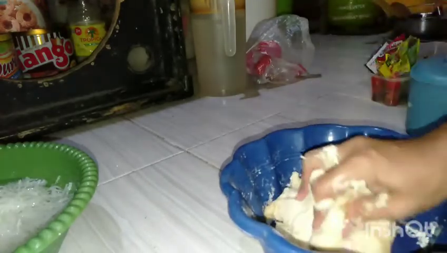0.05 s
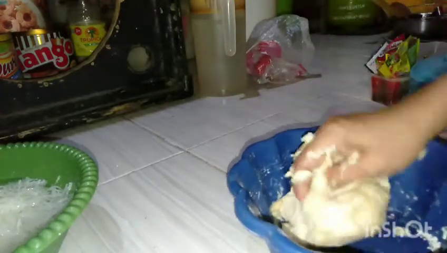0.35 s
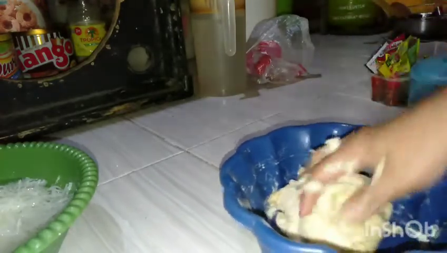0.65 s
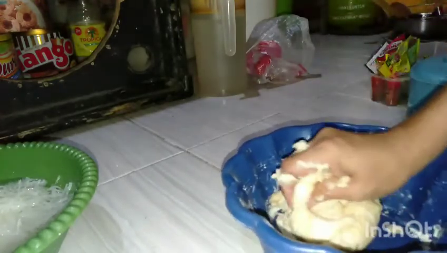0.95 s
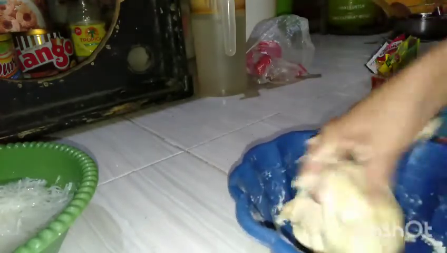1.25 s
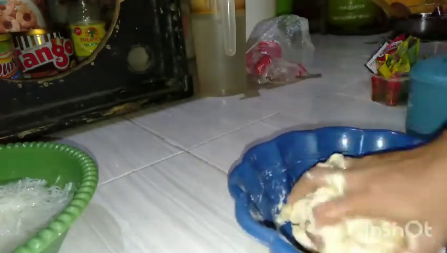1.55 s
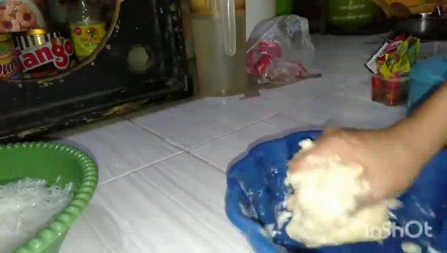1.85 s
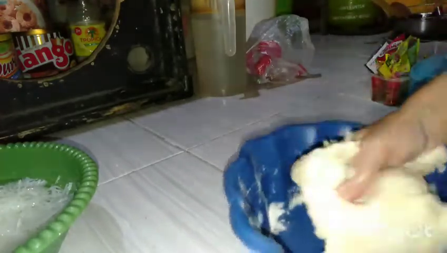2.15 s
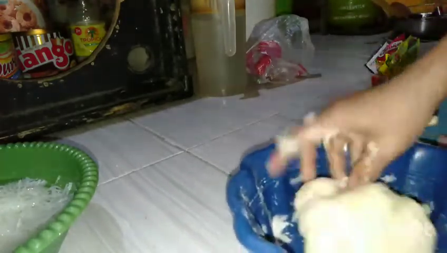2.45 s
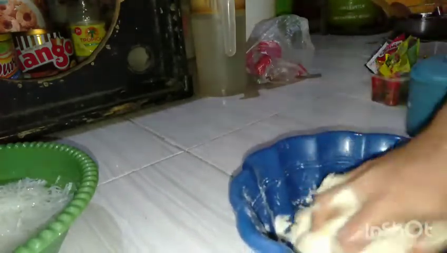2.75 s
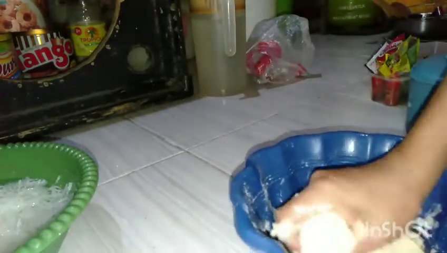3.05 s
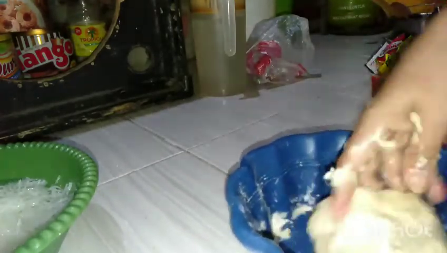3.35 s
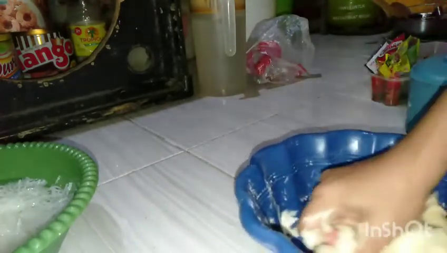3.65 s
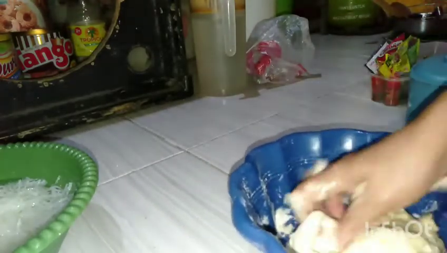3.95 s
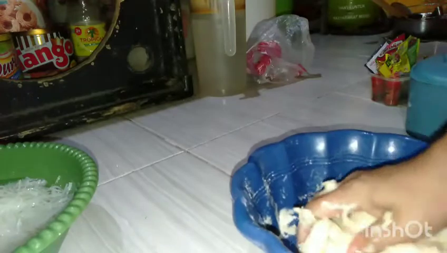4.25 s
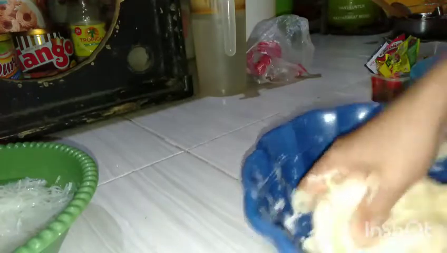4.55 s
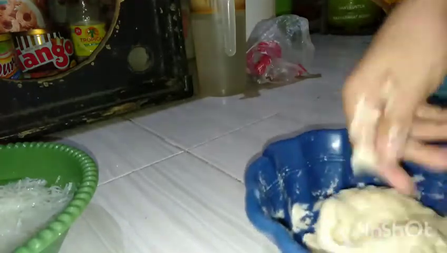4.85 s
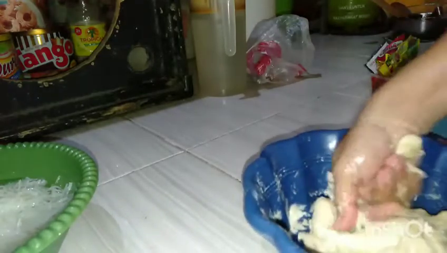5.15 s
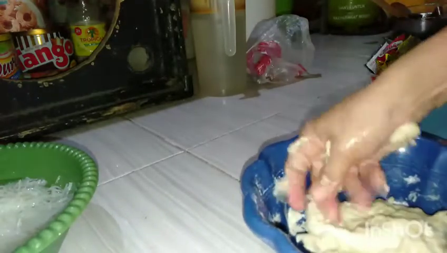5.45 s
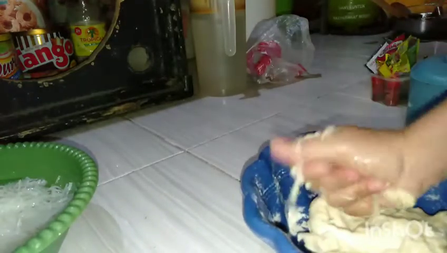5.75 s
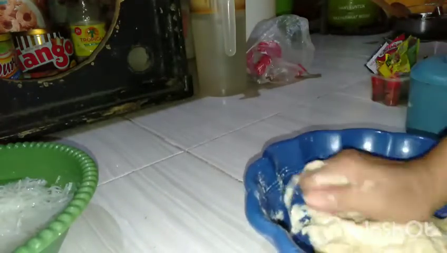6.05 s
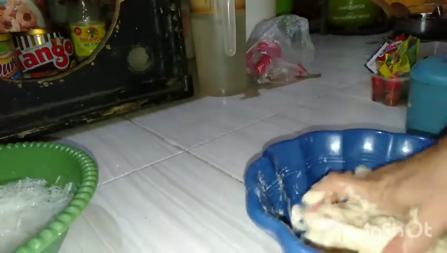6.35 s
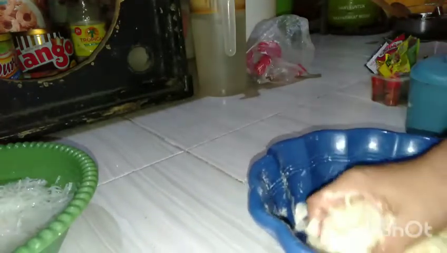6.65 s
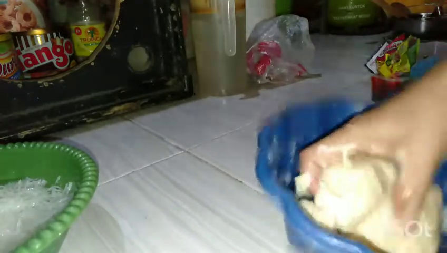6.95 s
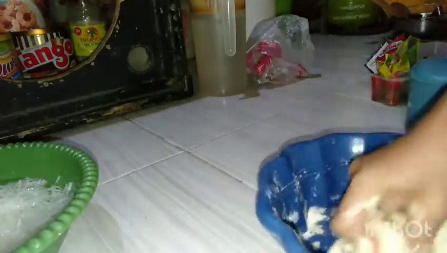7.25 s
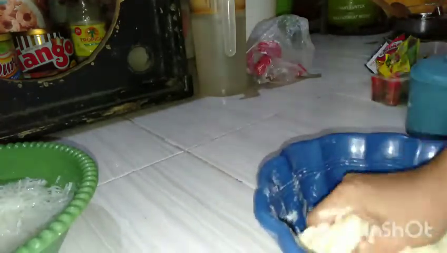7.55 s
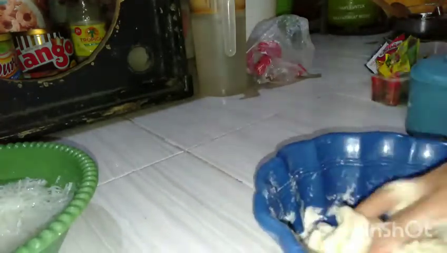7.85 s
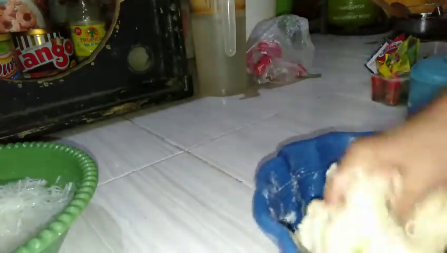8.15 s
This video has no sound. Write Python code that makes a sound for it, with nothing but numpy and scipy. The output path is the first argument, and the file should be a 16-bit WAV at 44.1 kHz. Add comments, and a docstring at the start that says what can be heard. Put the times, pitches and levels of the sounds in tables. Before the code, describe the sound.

Oily dough crackles quietly as a hand squeezes it in a plastic bowl, then gives uneven wet slaps and hollow pops, with soft thuds and tiny snaps of sticky strands. After a brief lull past the middle, two sharp, louder slaps land. The microphone is right beside the bowl in a small, hard kitchen with a short echo, a low rumble and faint distant chirps.

```python
"""A sticky crackle, then wet slaps: a hand kneads oiled dough in a plastic bowl, close to the microphone.
The bowl stands on a tiled kitchen floor. Slaps burst pockets of trapped air and ring its wall; oily
folds squelch, strands snap, the stretched skin sizzles, and the heel of the hand thuds into the lump.
The small hard room answers. Further off are faint birdlike chirps and the low rumble of the house."""
import sys
import numpy as np
from scipy import signal
from scipy.fft import rfft, irfft
from scipy.io import wavfile

SR = 44100
rng = np.random.default_rng(int(sys.argv[2]) if len(sys.argv) > 2 else 0)


def int16_out(signal):
    """Quantize to a 16-bit WAV file."""
    q = np.round(np.clip(np.atleast_2d(signal).T, -1, 1) * 32767)
    wavfile.write(sys.argv[1], SR, q.astype(np.int16))


N = 365588


# Spectrum of a bursting film, heard close up: (frequency [Hz], level [dB])
SNAP_SPECTRUM = [(80, -51), (300, -55), (900, -5), (2800, 13), (3900, 10), (4700, 11.5), (5700, 13),
                 (6600, 17), (7700, 3), (10000, -6), (12500, -7), (15600, 2.5)]
OVERTONE_RATIO, OVERTONE_DB = 2.22, -22  # the pocket's second resonance, relative to its first
def pop(db, hz, cycles, crack_db, size=4096):
    """A bursting air pocket gives a hollow pop of a few cycles, with a crack that frays into spatter."""
    t, kick = np.arange(size) / SR, signal.unit_impulse(size)
    pocket = soften(resonate(kick, hz, q=cycles), hz * 1.63)
    pocket = peaked(thin(pocket, hz * 0.074))
    overtone = peaked(soften(resonate(kick, hz * OVERTONE_RATIO, q=3.0), hz))
    hollow = peaked(pocket + amp(OVERTONE_DB) * overtone)
    hollow = hollow - 2 * resonate(hollow, hz * 1.3, q=1.0)  # all-pass: the pop swells in
    spatter = rng.standard_normal(size) * rise_and_fall(t, 0.0005, 0.0009)
    crack = amp(-20.5) * evened(colour(spatter, SNAP_SPECTRUM))
    return amp(db) * (hollow + amp(crack_db) * crack)


# Dough slapping the bowl, right at the microphone; the last three columns are gains on the level:
# (time [s], level [dB], pitch [Hz], ring [cycles], crack [dB], oil [dB], bowl drive [dB])
DOUGH_SLAPS = [(.539, -44, 1190, 1.9, -17, -12, -50), (0.5944, -32, 903, 2.3, -10, -17.5, -43.5),
               (0.613, -41, 1020, 6.6, -5, -23, -39), (0.6284, -32.5, 972, 9, -23, -18, -55),
               (0.8429, -41, 1350, 1.6, -10, -14, -45), (0.964, -48, 1700, 4, -12, -17, -56),
               (1.1607, -37.5, 1470, 0.85, -4, -16, -37.5), (1.2685, -36, 885, 1.9, -14, -14, -42),
               (1.546, -45, 1880, 2, -17, -10, -53), (1.859, -21, 837, 5.2, -32, -24.5, -64),
               (1.8609, -21, 1800, 3.2, -21.5, -31, -68), (2.0867, -35, 974, 16, -17, -7, -49),
               (2.101, -27.5, 980, 3.8, -10.5, -11.5, -38), (2.126, -33, 645, 3.3, -33, -16, -48),
               (2.1365, -36, 410, 5.3, -33, -17, -49), (2.2175, -43.5, 940, 3.3, -14, -16, -30),
               (2.2392, -38, 690, 3.2, -13, -15, -62), (2.2445, -33.5, 596, 3.4, -27, -18, -64),
               (2.255, -34, 950, 5.3, -7, -9, -51), (2.3158, -29.5, 1080, 1.2, -20, -21, -46),
               (2.3237, -30, 1210, 2, -34, -35, -56), (2.5367, -42, 940, 7.4, -32, -20, -54),
               (2.5695, -50, 640, 6.4, -26, -18, -52), (3.2613, -26, 683, 3.2, -36, -16, -43.5),
               (3.287, -22, 1100, 1.2, -12, -14.5, -41.5), (3.467, -37, 1220, 4, -30, -18.5, -41),
               (4.0303, -37, 1370, 0.67, -10, -8.5, -34.5), (4.0815, -28.5, 2230, 2.6, -1.5, -15, -53),
               (4.4797, -42, 790, 1.6, -34, -24, -46), (4.583, -42.5, 1400, 3, -21, -18, -54),
               (4.621, -45, 1100, 3.1, -24, -23, -56), (4.6585, -19, 840, 0.9, -29, -22, -38),
               (4.6632, -23, 880, 2.7, -24, -18, -48), (4.665, -24.5, 1260, 2, -17, -16, -52),
               (4.6725, -22.5, 736, 3.3, -8, -12, -50.5), (4.985, -47.5, 1550, 2.2, -2, -8, -35),
               (5.481, -44.5, 950, 3.5, -34, -28, -35.5), (6.4588, -36.5, 1390, 6.1, -8, -5.5, -53),
               (7.0101, -17, 613, 1.8, -42, -22, -44.5), (7.0137, -15.5, 800, 1.8, -34, -23, -59),
               (7.023, -28, 606, 4.4, -40, -36, -57), (7.0308, -16, 920, 4.7, -7.5, -13.5, -56),
               (7.0335, -17.5, 1010, 3.6, -11.5, -37, -66), (7.045, -25.5, 720, 4.3, -14, -17, -50),
               (7.148, -38.5, 1100, 2.2, -19, -11, -39), (7.846, -26, 830, 3.8, -15.5, -19, -50),
               (7.8661, -11.5, 1016, 7.7, -6, -13.5, -45), (7.8739, -15, 1004, 2.2, -5, -6.5, -52),
               (7.8805, -11, 1066, 2.7, -34, -29, -47.5)]
OIL_PITCH_RATIO, OIL_FIZZ_DB, OIL_S = 1.705, -18.5, 0.0047
TOUCH_S, TOUCH_DB = 0.0035, -15  # the skin meets the oil just before the blow
def slaps():
    """Each slap is a soft touch, then a pop over a squelch of oil; the pop rings the bowl."""
    out = np.zeros(N)
    for s, db, hz, cycles, crack_db, oil_db, ring_db in DOUGH_SLAPS:
        burst, oil_hz = pop(db, hz, cycles, crack_db), hz * OIL_PITCH_RATIO
        add(out, s, burst)
        add(out, s, amp(ring_db) * bowl(burst))
        add(out, s - TOUCH_S, squelch(TOUCH_S, db + oil_db + TOUCH_DB, oil_hz, OIL_FIZZ_DB))
        add(out, s, squelch(OIL_S, db + oil_db, oil_hz, OIL_FIZZ_DB))
    return out


# Modes of the plastic bowl's wall and hollow: (frequency [Hz], level [dB], t60 [s])
BOWL_MODES = [(250, -0.5, 0.16), (300, -5, 0.054), (380, -7.5, 0.078), (462, -3.5, 0.12),
              (604.3, 0.5, 0.15), (675.7, -1.5, 0.11), (877, -4.5, 0.048), (1016, -2, 0.035),
              (1210, -13, 0.022), (1353, -5, 0.14), (1966, 6.5, 0.051), (2170, 2, 0.059), (2580, -30, .072)]
WALL_DETUNE, WALL_SAG, WALL_SAG_S = .025, .035, .02  # two shares of the pitch, and the settling time
def bowl(x):
    """The bowl's modes ring, shifted by where the dough lies and sagging as its weight settles."""
    t = np.arange(SR // 3) / SR
    shifts = 1 + WALL_DETUNE * rng.uniform(-1, 1, len(BOWL_MODES))
    clock = t + WALL_SAG * WALL_SAG_S * (1 - np.exp(-t / WALL_SAG_S))
    ring = sum(amp(db - 60 * t / t60) * np.cos(2 * np.pi * hz * shift * clock)
               for (hz, db, t60), shift in zip(BOWL_MODES, shifts))
    return signal.oaconvolve(x, ring)[:N]


# Spectrum of sticky skin peeling, heard close up: (frequency [Hz], level [dB])
PEEL_SPECTRUM = [(500, -22), (2000, -7), (3200, -4), (4800, -9), (5700, -4), (6600, 2), (8200, -8),
                 (11000, -11), (13500, -6), (15600, 2)]
def squelch(length, db, hz, fizz_db, size=12000):
    """A rush of tiny bursts rings a fold and its wet bubbles, and fizzes where the sticky skin parts."""
    t = np.arange(size) / SR
    u = t / max(length, .002)
    rush = clicks(per_s=4000, spread_db=3.0, size=size) * (1 - np.exp(-u / 0.05)) * np.exp(-u ** 2)
    body = soften(resonate(rush, hz, q=0.38), hz * 2.43)
    fold = evened(thin(body, hz * 0.041)) + amp(-1.5) * evened(colour(rush, SNAP_SPECTRUM))
    pitches = hz * np.geomspace(.62, 1.65, num=5) * rng.uniform(0.93, 1.05, size=5)
    struck = rng.integers(len(pitches), size=size)  # each burst rings one bubble
    bubbles = evened(sum(resonate(rush * (struck == k), f, q=11) / f for k, f in enumerate(pitches)))
    fizz = evened(colour(rush, PEEL_SPECTRUM))
    return amp(db) * np.sqrt(length / t[-1]) * (.65 * fold + .75 * bubbles + amp(fizz_db) * fizz)


# Oily folds in the bowl: (time [s], length [s], level [dB], pitch [Hz], relative fizz [dB])
OILY_FOLDS = [(0.561, 0.06, -61.5, 1390, -12), (0.61, 0.03, -54, 1460, -14),
              (0.842, 0.0054, -51.5, 1720, -7), (0.857, 0.11, -66, 1800, -18), (1.043, 0.021, -52, 1620, 2),
              (1.068, 0.21, -65, 1810, 6), (1.176, 0.0045, -51, 1520, 0), (1.284, 0.0093, -44, 1630, -19),
              (1.613, 0.031, -61, 2370, 2), (1.633, 0.032, -54, 1770, -8),
              (1.996, 0.012, -54.5, 1300, 11.5), (2.316, 0.024, -40.5, 1526, -27),
              (2.897, 0.0046, -59, 1640, 8.5), (3.2815, 0.0079, -35, 2230, -2.5),
              (3.3015, 0.0048, -38, 1880, -14), (4.054, 0.0091, -51.5, 1420, -18),
              (4.073, 0.038, -44, 2080, -11), (4.155, 0.077, -56, 1480, -25),
              (4.661, 0.014, -39, 1940, -23), (4.6965, 0.0041, -41, 2560, 0),
              (6.295, 0.0082, -39.5, 1660, -9), (6.3103, 0.011, -40, 1900, -7),
              (6.35, 0.16, -57.5, 1930, -2), (6.463, 0.03, -45, 1950, -14), (7.0292, 0.0038, -39, 2200, 14),
              (7.606, 0.055, -66.5, 1410, 12), (8.14, 0.024, -55.5, 1440, -7)]
def squelches():
    """The fingers squeeze folds shut and pull them apart."""
    out = np.zeros(N)
    for s, length, db, hz, fizz_db in OILY_FOLDS:
        add(out, s, squelch(length, db, hz, fizz_db))
    return out


# Trapped air opening softly out of the dough: (time [s], level [dB], starting pitch [Hz])
AIR_PLOPS = [(1.678, -42.5, 1390), (2.042, -37.5, 1210), (3.678, -45, 3600), (4.181, -42.5, 1295),
             (5, -42, 1270), (8.176, -39, 1310)]
def plops(size=3000):
    """A pocket opens with a frothy gulp, and its pitch falls as it widens."""
    out, t = np.zeros(N), np.arange(size) / SR
    for s, db, hz in AIR_PLOPS:
        pitch = hz * (1 - 0.31 * (1 - np.exp(-t / 0.015)))
        gulp = np.sin(2 * np.pi * np.cumsum(pitch) / SR) * rise_and_fall(t, 0.0022, 0.0066)
        froth = soften(resonate(rng.standard_normal(size), hz, q=0.6), hz * 0.95)
        froth *= rise_and_fall(t, 0.00061, 0.023)
        add(out, s, amp(db) * (peaked(gulp) + amp(2.5) * peaked(froth)))
    return amp(-6.0) * out


# The heel of the hand landing on the lump: (time [s], level [dB], pitch [Hz])
HAND_THUDS = [(0.847, -46, 223), (1.164, -40.5, 206), (1.545, -45.5, 92), (1.862, -40.5, 250),
              (2.099, -43, 144), (2.124, -40, 275), (2.249, -47.5, 212), (2.321, -49, 250),
              (3.287, -41.5, 186), (4.66, -35, 338), (4.674, -39.5, 179), (6.298, -40, 138),
              (7.013, -49, 280), (7.03, -30.5, 280), (8.178, -53, 110)]
def thuds(size=8000):
    """The soft lump takes one dull push and wobbles briefly."""
    out, t = np.zeros(N), np.arange(size) / SR
    for s, db, hz in HAND_THUDS:
        wobble = np.sin(2 * np.pi * hz * t) * rise_and_fall(t, 0.0015, 0.51 / hz)
        u = t * hz / 2.0
        push = soften((1 - u) * np.exp(-u), hz * 1.6)
        add(out, s, amp(db) * (peaked(wobble) + amp(-2.5) * peaked(push)))
    return amp(3.0) * thin(out, hz=63.0)


# Strands snapping off the skin, close up: (time [s], level [dB], lower microphone peak's share [dB])
STRAND_TICKS = [(0.4387, -40, 10), (0.5194, -50, 2), (0.6764, -52, 0), (0.9317, -44.5, 2), (1.546, -54, 2),
                (1.667, -36.5, -1), (0.801, -61, -7), (2.9885, -59, -22), (3.175, -39, -4),
                (3.202, -40, -5), (3.237, -35, -8), (3.682, -43, -5), (3.72, -49, 8), (3.8887, -48, -7),
                (4.279, -43, -9), (4.2911, -46, -20), (4.329, -31, 3), (4.396, -42.5, -1.5),
                (4.451, -48, -4), (4.543, -38.5, -6), (4.561, -45, -6), (5.006, -35.5, -5),
                (5.975, -41.5, -13), (6.587, -38, -3), (6.642, -40, -2), (6.66, -42, -6), (6.77, -47, -19),
                (6.8837, -45, -15), (6.9005, -34.5, -6.5), (6.938, -39, -5), (7.596, -46, -15),
                (7.614, -29, -8), (8.092, -38.5, 3), (8.1473, -33, -8)]
MIC_LOW_PEAK_HZ, MIC_HIGH_PEAK_HZ = 6570, 15300
def ticks(size=1500):
    """A tiny crisp tick of parting dough, coloured by the microphone's two treble peaks."""
    out, t = np.zeros(N), np.arange(size) / SR
    for s, db, low_db in STRAND_TICKS:
        spray = rng.standard_normal(size) * rise_and_fall(t, 0.0011, 0.0018)
        low = peaked(resonate(spray, MIC_LOW_PEAK_HZ, q=9.7))
        high = peaked(resonate(spray, MIC_HIGH_PEAK_HZ, q=7.5))
        share = min(amp(low_db), .95)
        add(out, s, amp(db) * (share * low + np.sqrt(1 - share ** 2) * high))
    return amp(-2.5) * out


# Stretches of the dough's oily skin: (time [s], length [s], level [dB])
SKIN_STRETCHES = [(0.335, 0.19, -61), (.8, 0.12, -68), (1.06, 0.34, -58), (2.857, 0.11, -67),
                  (3.03, 0.38, -72), (3.62, 0.2, -57.5), (3.847, 0.11, -49.5), (4.203, .15, -74),
                  (4.365, 0.38, -54), (6.472, 0.31, -58.5), (6.766, 0.33, -56.5), (7.12, 0.38, -64),
                  (7.67, 0.069, -57), (7.95, 0.27, -63)]
# Their bright spectrum, as the microphone colours it: (frequency [Hz], level [dB])
SIZZLE_SPECTRUM = [(1000, -37), (4500, -14), (6700, -5), (9000, -17), (12000, -11), (14000, -2), (15600, 4)]
def sizzles():
    """Stretched skin sizzles in clumps of the finest clicks, swelling until it parts."""
    out, t = np.zeros(N), np.arange(N) / SR
    clumps = amp(4.5 * np.clip(wander(hz=45.0, size=N), -2, 2))
    crackle = clicks(per_s=1100, spread_db=3.5, size=N) * clumps
    sizzle = evened(colour(crackle, SIZZLE_SPECTRUM))
    for s, length, db in SKIN_STRETCHES:
        u = np.clip((t - s) / length, 0, 1)
        out += amp(db) * np.sqrt(abs(np.sin(np.pi * u ** 1.3))) * sizzle
    return out


# Kneading strokes, a press and then a pull: (time [s], length [s], squeeze [dB], peel [dB])
KNEADING_STROKES = [(0.0, 0.99, -65, -61.5), (0.83, 0.41, -59, -59.5), (1.52, 0.81, -63.5, -56.5),
                    (2.152, 0.28, -63, -54.5), (2.693, 0.86, -65.5, -57.5), (3.43, 1, -67, -65),
                    (4.032, 0.71, -64.5, -66), (6.266, 1, -69.5, -62), (7.025, 0.6, -61.5, -61),
                    (7.954, 0.26, -65, -56)]
PRESS_AT, PULL_AT = 0.16, 0.8  # shares of the stroke at which press and pull are hardest
PRESS_SHARPNESS, PULL_GROWTH_DB, LET_GO_S = 0.22, 8, 0.074
RESTING_SQUEEZE_DB, RESTING_PEEL_DB = -68.5, -69.5  # the fingers never quite stop
def effort():
    """Strength of squeeze and peel: a stroke pushes early, then pulls harder until the dough lets go."""
    t = np.arange(N) / SR
    squeeze_power, peel_power = amp(RESTING_SQUEEZE_DB) ** 2, amp(RESTING_PEEL_DB) ** 2
    for s, length, squeeze_db, peel_db in KNEADING_STROKES:
        u = np.maximum(t - s, 0) / length
        press = (u / PRESS_AT * np.exp(1 - u / PRESS_AT)) ** PRESS_SHARPNESS
        grip = np.minimum(u / PRESS_AT, 1) * amp(PULL_GROWTH_DB * np.minimum(u / PULL_AT - 1, 0))
        pull = grip * np.exp(-np.maximum(u - PULL_AT, 0) * length / LET_GO_S)
        squeeze_power += (amp(squeeze_db) * press) ** 2
        peel_power += (amp(peel_db) * pull) ** 2
    return np.sqrt(squeeze_power), np.sqrt(peel_power)


# Spectrum of squeezed dough, faint even close up: (frequency [Hz], level [dB])
SQUEEZE_SPECTRUM = [(60, 17), (250, -11.5), (600, -4.5), (1150, 2.5), (1700, -2.5), (3000, -3.5),
                    (5000, -13), (12000, 3)]
def kneading():
    """Small bubbles pop in the squeezed dough, and its skin peels from the fingers in clumps."""
    squeeze, peel = effort()
    bubbles = sum(resonate(clicks(per_s=90, spread_db=2.0, size=N), hz, q=9.9) / np.sqrt(hz)
                  for hz in np.geomspace(150, 5000, num=24))
    clumps = amp(0.5 * wander(hz=30.0, size=N))
    crackle = clicks(per_s=1400, spread_db=3.5, size=N) * clumps
    squeezing = squeeze * evened(colour(bubbles, SQUEEZE_SPECTRUM))
    return squeezing + peel * evened(colour(crackle, PEEL_SPECTRUM))


# Thin squeaks under the hand: (time [s], length [s], level [dB], first pitch [Hz], last pitch [Hz])
SKIN_SQUEAKS = [(0.0, 0.062, -60, 1410, 1464), (0.13, 0.16, -64, 1970, 1900),
                (0.842, 0.61, -61, 1407, 1340), (0.855, 0.18, -62, 1780, 1685),
                (1.066, 0.11, -58.5, 1060, 1030), (1.431, 0.06, -53.5, 1450, 1220),
                (1.483, 0.2, -56.5, 1005, 969), (2.218, 0.026, -49.5, 3140, 2890),
                (2.903, 0.079, -59, 1780, 1600), (4.161, 0.072, -49, 1202, 1176)]
def squeaks(size=26000):
    """Skin sticks and slips on the dough: a narrow, rough tone swells and glides a little."""
    out, t = np.zeros(N), np.arange(size) / SR
    for s, length, db, first_hz, last_hz in SKIN_SQUEAKS:
        u = np.minimum(t / length, 1)
        flutter_hz = 16 * wander(hz=25.0, size=size)
        grip = evened(1 + 1.1 * wander(hz=70.0, size=size))
        turns = np.cumsum(first_hz + (last_hz - first_hz) * u + flutter_hz) / SR
        add(out, s, amp(db) * np.sin(np.pi * u) * grip * np.sin(2 * np.pi * turns))
    return out


# First echoes to reach the microphone, off the floor tiles and oven door: (delay [s], level [dB])
FIRST_ECHOES = [(.0095, -22.5), (0.0142, -25), (0.0215, -41), (.033, -20)]
# Decay of the small kitchen around the bowl: (frequency [Hz], t60 [s])
KITCHEN_DECAY = [(150, 0.2), (700, 0.2), (2500, 0.19), (7000, 0.19), (15000, 0.21)]
def kitchen(x, wet_db, onset_s):
    """The direct sound, a few dull first echoes, and the short tail of tiles and cupboards."""
    out = x + amp(wet_db) * tail(x, KITCHEN_DECAY, onset_s)
    dull = soften(x, hz=2570.0)
    for s, db in FIRST_ECHOES:
        add(out, s, amp(db) * dull)
    return out


# Faint raspy notes well off the microphone, perhaps a bird:
# (time [s], length [s], level [dB], pitch [Hz], width [Hz], relative octave [dB], relative rasp [dB])
FAR_CHIRPS = [(0.08, 0.2, -72, 2810, 397, 10, 7), (1.058, 0.17, -58, 2320, 350, -3.5, -20),
              (1.22, 0.066, -50, 3070, 800, -10, -8.5), (1.268, 0.058, -59.5, 2830, 402, 7.5, -18),
              (2.556, 0.076, -59, 4000, 450, -11, -2), (4.827, 0.056, -61, 2700, 600, 1.5, 0.5),
              (4.849, 0.09, -61, 4450, 400, -13, -9), (4.995, 0.11, -58, 3700, 1000, -9.5, -7.5),
              (5.281, 0.13, -70, 2600, 1800, -22, -18), (5.665, 0.24, -81, 2970, 800, 13, 9.5),
              (5.869, 0.08, -63.5, 2580, 710, 0.5, -15), (6.241, 0.12, -65, 2570, 250, 5, 5.5),
              (6.776, 0.14, -69, 4550, 453, -14, 7), (7.925, 0.066, -61, 2680, 200, 7, -3),
              (8.008, 0.062, -62, 2330, 220, 4, -6)]
# Decay of the space they come through: (frequency [Hz], t60 [s])
FAR_DECAY = [(2000, 0.42), (8000, 0.57)]
def chirps(size=SR // 2):
    """Short husky notes with an octave above and a broad rasp, blurred by the echo on their way."""
    out = np.zeros(N)
    for s, length, db, hz, width_hz, octave_db, rasp_db in FAR_CHIRPS:
        u = np.minimum(np.arange(size) / (length * SR), 1)
        note = band(hz, width_hz, size) + amp(octave_db) * band(2 * hz, 2 * width_hz, size)
        hiss = soften(rng.standard_normal(size), hz=6800.0, order=4)
        rasp = evened(thin(hiss, hz=2100.0))
        add(out, s, amp(db) * np.sqrt(abs(np.sin(np.pi * u))) * (note + amp(rasp_db) * rasp))
    return amp(0.5) * tail(out, FAR_DECAY, onset_s=0.0009)


# Room tone where the microphone stands: (frequency [Hz], level [dB])
ROOM_TONE_SPECTRUM = [(12, -12), (20, -1), (45, -2), (66, 2), (105, -1), (200, -10), (377, -15),
                      (1150, -15), (2000, -18), (4800, -23), (6700, -21), (9400, -29), (12000, -30),
                      (16000, -21)]
def room_tone(rms_db):
    """Low rumble of the house and an even hiss."""
    shape = amp(curve_at(ROOM_TONE_SPECTRUM, np.fft.rfftfreq(N, 1 / SR)))
    return amp(rms_db) * evened(irfft(rfft(rng.standard_normal(N)) * shape, N))


def tail(x, decay, onset_s):
    """Close-packed echoes fade in, each band dying at its own speed."""
    taps = rng.standard_normal(SR // 2) * (rng.random(SR // 2) < 5000 / SR)  # 5000 echoes a second
    hz, t, bands = signal.stft(taps, SR, nperseg=256)
    fade = amp(-60 * t / curve_at(decay, hz)[:, None])
    echoes = signal.istft(bands * fade, SR, nperseg=256)[1]
    echoes *= 1 - np.exp(-(np.arange(len(echoes)) / SR / onset_s) ** 2)
    return signal.oaconvolve(x, echoes / np.linalg.norm(echoes))[:N]


def clicks(per_s, spread_db, size):
    """Oil films breaking at random moments: many small, a few large."""
    chance, sign = rng.random((2, size))
    strength = amp(spread_db * np.minimum(rng.exponential(1, size), 4))
    return (chance < per_s / SR) * np.sign(sign - .5) * strength


def band(hz, width_hz, size):
    """A rush of noise around one pitch."""
    q = hz / width_hz
    return evened(resonate(resonate(rng.standard_normal(size), hz, q), hz, q))


def wander(hz, size):
    """Random drift of unit rms, mostly slower than hz."""
    return evened(soften(rng.standard_normal(size), hz))


def colour(x, points, size=2048):
    """Causal filter with the given spectrum, so that clicks keep their sharp fronts."""
    log_gain = np.log(amp(curve_at(points, abs(np.fft.fftfreq(size, 1 / SR)))))
    taps = np.fft.ifft(np.exp(np.conj(signal.hilbert(log_gain)))).real
    return signal.oaconvolve(x, taps[:size // 2])[:len(x)]


def resonate(x, hz, q):
    """One damped resonance that rings for about q cycles."""
    return signal.lfilter(*signal.iirpeak(min(hz, SR * .45), max(q, .4), SR), x)


def soften(x, hz, order=2):
    """A soft contact lacks the treble above hz."""
    return signal.lfilter(*signal.butter(order, min(hz, SR / 3), fs=SR), x)


def thin(x, hz):
    """A small source radiates little below hz."""
    return signal.lfilter(*signal.butter(2, hz, "high", fs=SR), x)


def rise_and_fall(t, rise_s, fall_s):
    return (1 - np.exp(-t / rise_s)) * np.exp(-t / fall_s)


def amp(db):
    return 10 ** (np.asarray(db) / 20)


def evened(x):
    return x / np.sqrt(np.mean(x ** 2) + 1e-20)


def peaked(x):
    return x / np.max(abs(x))


def curve_at(points, hz):
    point_hz, values = np.transpose(points)
    return np.interp(np.log(hz + 1), np.log(point_hz + 1), values)


def add(mix, s, sound):
    part = mix[max(round(s * SR), 0):][:len(sound)]
    part += sound[:len(part)]


def scene():
    """One microphone close to the bowl on the kitchen floor, the same in both channels."""
    folds = squelches() + plops()
    dough = slaps() + folds + amp(-49.5) * bowl(folds)
    dough += ticks() + sizzles() + kneading() + thuds() + squeaks()
    mono = kitchen(dough, wet_db=-8.5, onset_s=0.003) + chirps() + room_tone(rms_db=-64.7)
    return np.array([mono, mono])


CEILING, BAND_LIMIT_HZ = .52, 15900
def record(dry):
    """The recorder rounds off the highest peaks and cuts the top of the treble."""
    rounded = CEILING * np.tanh(dry / CEILING)
    lowpass = signal.firwin(511, BAND_LIMIT_HZ, window=("kaiser", 9), fs=SR)
    return signal.oaconvolve(rounded, lowpass[None], "same")


dry = scene()
out = record(dry)
int16_out(out)
```